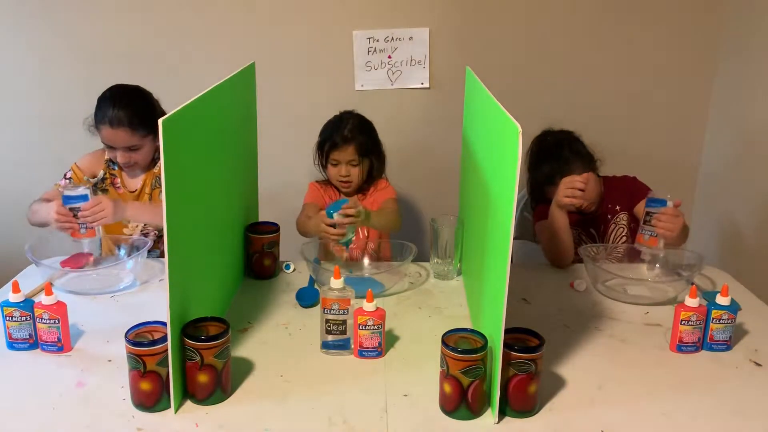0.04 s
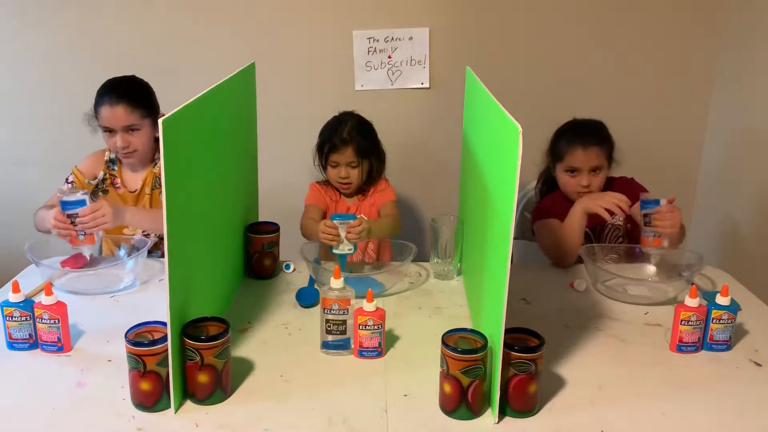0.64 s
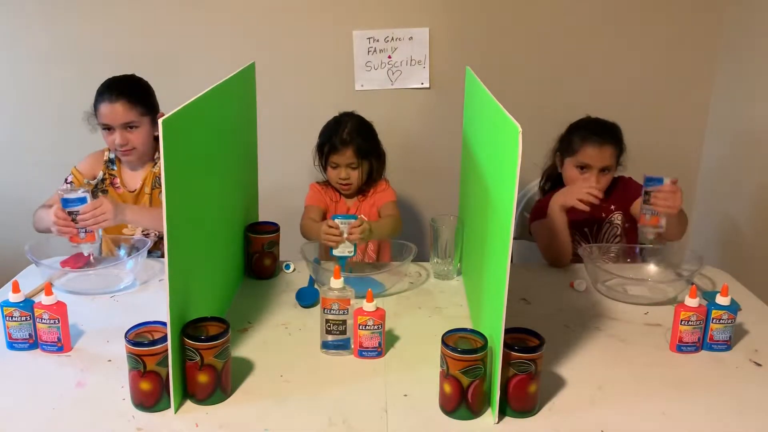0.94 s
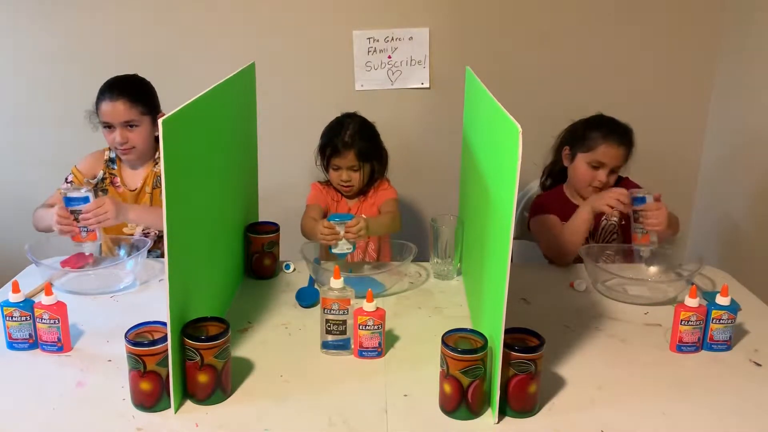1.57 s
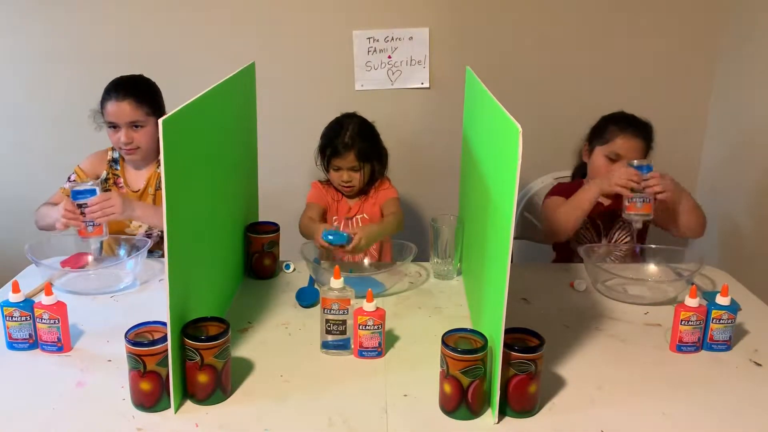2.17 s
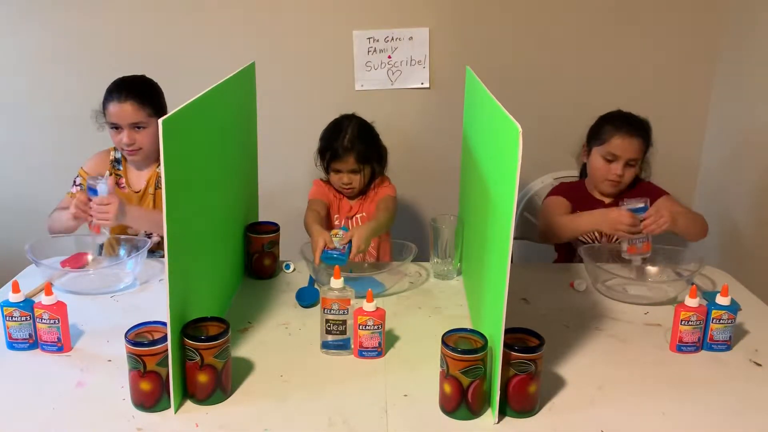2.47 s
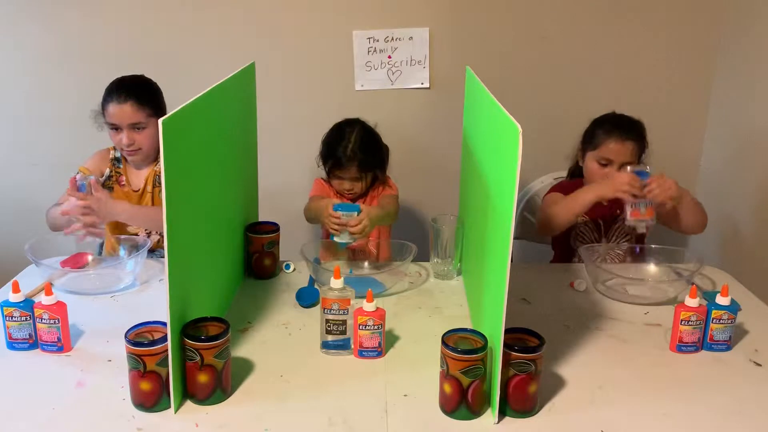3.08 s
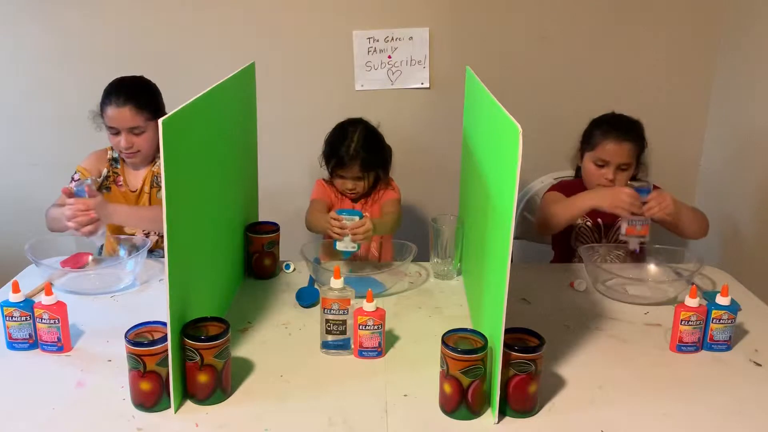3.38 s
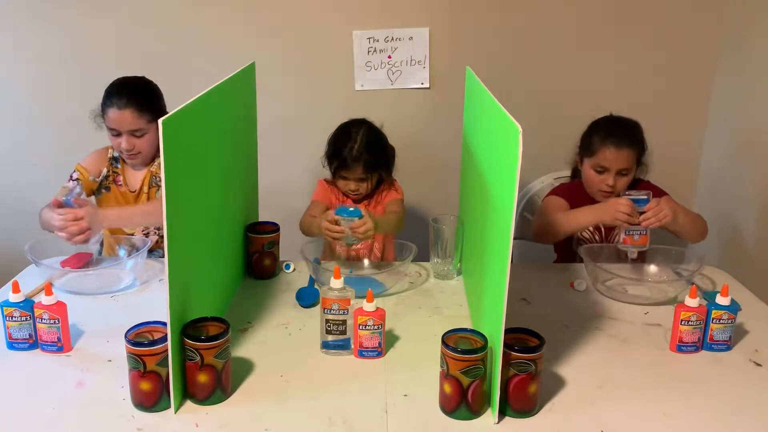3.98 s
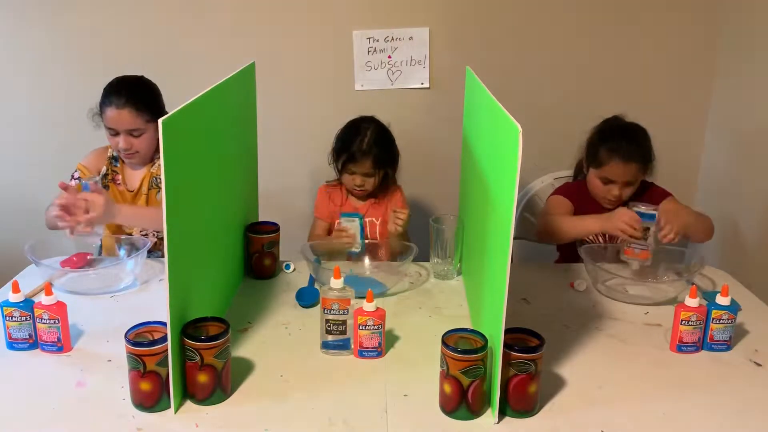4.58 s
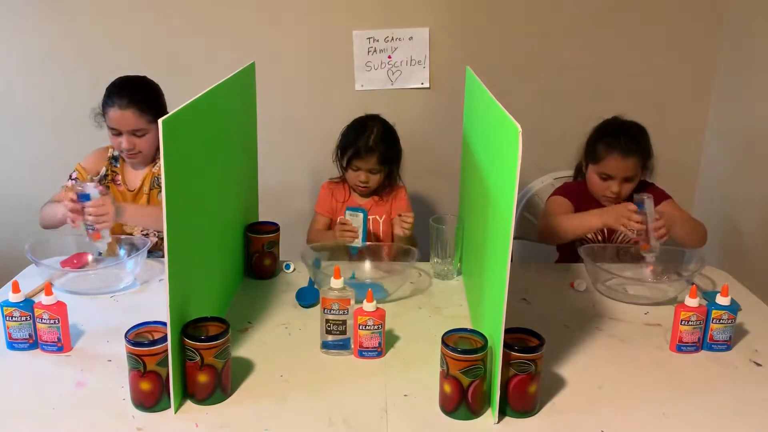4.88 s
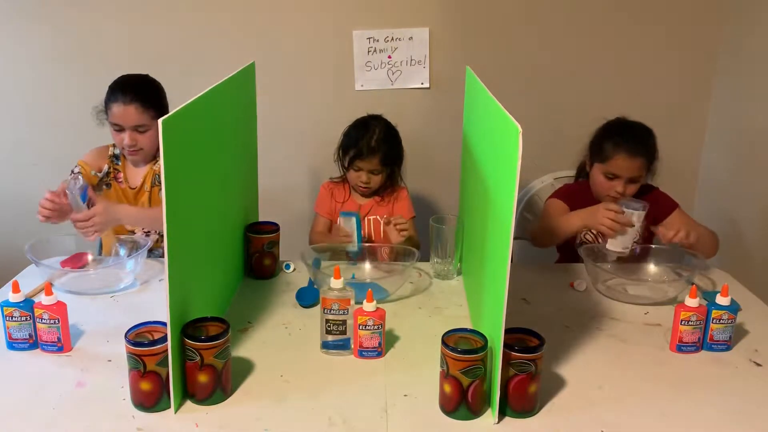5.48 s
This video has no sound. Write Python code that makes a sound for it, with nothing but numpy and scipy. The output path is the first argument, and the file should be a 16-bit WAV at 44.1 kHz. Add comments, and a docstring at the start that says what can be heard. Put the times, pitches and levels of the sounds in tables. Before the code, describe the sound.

Over a faint, low appliance hum, glue sputters from squeezed plastic bottles in many brief, wet, hissy spits, mixed with soft low plops and quiet handling. Near the end the squelching stops, a plastic cap clicks, and a hollow bottle clacks and thuds unevenly against a table. The sounds spread across a stereo microphone, with the short reflections of a small, bare room.

```python
"""Three children squeeze glue from plastic bottles into bowls at a table in a small, bare room.
An appliance hums faintly throughout. For the first 4.5 s air spits through the glue at the nozzles
in short fizzing squelches, a few with a squeak, while bubbles glug inside the bottles and hands rub them.
At 4.6 s a cap snaps. From 4.9 s to the end a hollow bottle knocks about on the table."""
import sys
import numpy as np
from scipy import signal
from scipy.fft import rfft, irfft
from scipy.io import wavfile
from scipy.ndimage import uniform_filter1d

SR = 44100
rng = np.random.default_rng(int(sys.argv[2]) if len(sys.argv) > 2 else 0)


def file_out(sig):
    """Save sig as 16-bit WAV at sys.argv[1]."""
    # one column per channel
    cols = np.atleast_2d(sig).T
    # limit, then scale
    lim = np.clip(cols, -1, 1)
    pcm = np.round(lim * 32767).astype(np.int16)
    wavfile.write(sys.argv[1], SR, pcm)


N = 252693
T = np.arange(18000) / SR  # time axis of one event, seconds

# Room decay. Each row: frequency in Hz, T60 in seconds.
ROOM_T60 = [(150, 0.27), (400, 0.37), (1000, 0.29), (2800, 0.4), (7000, 0.33), (14000, 0.22)]
# Diffuse sound at the two microphones. Each row: frequency in Hz, correlation.
MIC_CORRELATION = [(60, 0.87), (250, 0.94), (500, 0.51), (1000, -0.12), (2000, 0.13), (4000, 0.58),
                   (8000, 0.17), (14000, -0.49)]
# Stereo width. Each row: frequency in Hz, side gain in dB.
STEREO_WIDTH = [(250, 1), (1000, -2.5), (4000, 5), (8500, 0.5), (13000, -1)]
# Still room air. Each row: frequency in Hz, relative density in dB.
AIR_SPECTRUM = [(25, -1), (50, 14), (100, 6), (160, -2.5), (300, -3), (450, -4), (900, -51), (2000, -29),
                (5000, -46.5), (7300, -37), (9000, -27), (13500, -53), (16000, -57)]
# Hands shifting on the bottles. Each row: time in seconds, level in dB.
HANDLING_LEVEL = [(0, -68), (.6, -67.5), (1.2, -60), (1.7, -65), (2.2, -62.5), (2.701, -66.5),
                  (3.35, -61.5), (3.8, -65), (4.4, -65.5), (5.201, -66), (5.73, -58)]
# A bottle or sleeve sliding. Each row: start in seconds, length in seconds, level in dB, centre in Hz.
SLIDES = [(0.25, .12, -59.5, 785), (3.304, 0.081, -63, 1450), (5.37, 0.13, -53, 1760)]
# Cap snapping. Each row: start in seconds, click level in dB, thud level in dB, thud pitch in Hz.
CAP_SNAPS = [(4.591, -53, -44.5, 225), (4.602, -32.5, -35.5, 273), (4.612, -39.5, -33.5, 193)]
# Overall tone of the click as heard, with a dip near 7.3 kHz. Each row: frequency in Hz, gain in dB.
CLICK_TONE = [(300, -9), (1100, -8.5), (1600, -5.5), (1900, 6), (2600, -1.5), (3500, -4.5), (4300, -15),
              (5400, -10.5), (7300, -26), (9000, -15.5), (14000, -35)]
# Bottle on table. Each row: start in seconds, clack level in dB, thud level in dB, thud pitch in Hz.
BOTTLE_KNOCKS = [(4.872, -18, -15.5, 228), (4.883, -28, -16.5, 264), (4.940, -59, -21, 186.4),
                 (4.960, -25, -19.5, 251), (5.036, -35.5, -26, 270), (5.278, -30.5, -16.5, 288),
                 (5.554, -23.5, -15, 247)]
# Ring of bottle and table. Each row: frequency in Hz, relative level in dB, T60 in seconds.
KNOCK_MODES = [(653, 12.5, 0.11), (840, -16, 0.06), (1153, -16, 0.14), (1810, -1, 0.075), (2040, 5, 0.14),
               (2280, -1, 0.08), (3700, 7, 0.073)]
# Overall tone of the clack as heard, with a dip near 7.3 kHz. Each row: frequency in Hz, gain in dB.
CLACK_TONE = [(150, -14), (400, -10.5), (750, -3), (1000, -3), (1250, -5), (1550, -9.5), (2400, -9.5),
              (3500, -15), (5000, -23), (6300, -23), (7300, -34.5), (8500, -20), (10000, -28), (14000, -38)]
# Bubbles in a bottle. Each row: start in seconds, level in dB, pitch in Hz, wall overtone in dB.
BOTTLE_GLUGS = [(0.053, -31, 233, -3.5), (0.061, -31.5, 287, -8.5), (0.372, -28, 273, -9.5),
                (0.382, -28.5, 248, -3.5), (0.525, -26, 293, -4.5), (0.543, -31.5, 232, 1),
                (0.762, -31, 240, 1), (0.853, -31.5, 268, -10), (0.941, -37, 260, -5),
                (1.038, -35, 250, -1), (1.094, -31, 233, -7.5), (1.293, -25.5, 282, -17.5),
                (1.396, -30, 266, -31), (1.53, -36.5, 231, -3.5), (1.711, -35, 220, -22),
                (1.83, -37, 258, -4), (1.857, -36, 290, -9), (2.001, -26.5, 252, -2.5),
                (2.12, -35, 260, -11), (2.286, -31.5, 289, 2.5), (2.582, -40.5, 244, -19),
                (2.827, -33.5, 277, 10.5), (2.848, -29.5, 279, 7.5), (2.99, -38, 349, -1),
                (3.358, -45, 257, -24), (3.485, -25.5, 226, -35), (3.636, -40, 251, -9),
                (3.897, -32.5, 243, -15), (3.97, -40, 279, 9), (4.151, -27.5, 246, -3),
                (4.265, -23.5, 272.6, -7)]
# Pinched nozzle. Each row: start in seconds, level in dB, pitch in Hz, decay in seconds.
NOZZLE_SQUEAKS = [(0.617, -39, 7920, 0.0036), (0.622, -49, 4580, .028), (0.830, -41, 4940, 0.0059)]
# Overall tone of the fizz as heard. Each row: frequency in Hz, gain in dB.
FIZZ_TONE = [(300, 0), (700, 15), (1400, 9.5), (2300, 3.5), (3600, 4), (5000, 2.5), (7500, 3.5),
             (9500, 4.5), (13000, -5.5), (14500, 4), (15500, -29)]
# Air bursting through glue. Each row: time in seconds, level in dB, decay in seconds,
# gain below 3.4 kHz in dB, nozzle resonance in Hz, side from -1 (left) to 1 (right).
NOZZLE_BURSTS = [(0.05, -44.5, .008, -5.5, 5020, 1), (0.374, -49, 0.0024, -2.5, 6670, -1),
                 (0.535, -39.5, 0.014, 1, 10000, 1), (0.749, -42.5, 0.095, -3.5, 8650, 0),
                 (0.803, -30, 0.0048, -13.5, 6240, -1), (0.903, -47.5, 0.012, -15.5, 8260, 1),
                 (1.034, -42, 0.015, -5, 9600, 1), (1.056, -39, .018, -5.5, 8720, 1),
                 (1.094, -39.5, 0.0048, -10.5, 8950, 1), (1.223, -50.5, 0.0081, -1.5, 6800, 0),
                 (1.382, -47.5, 0.023, 1.5, 2740, 0), (1.526, -42, 0.011, 3.5, 4270, 1),
                 (1.712, -41, 0.014, -6.5, 7300, -1), (1.819, -50.5, .007, -3, 8800, -1),
                 (1.835, -41, 0.024, -4.5, 8770, -1), (1.996, -42, .014, -2, 8200, 1),
                 (2.115, -46.5, 0.011, -1, 9000, 1), (2.285, -51, 0.013, 0.5, 7750, -1),
                 (2.598, -51, 0.045, -1.5, 9800, 0), (2.779, -56.5, 0.0033, -9, 9300, 0),
                 (2.83, -37, 0.021, 3, 3900, -1), (2.971, -44, 0.022, -2, 9800, 0),
                 (3.142, -52, .006, -7, 8300, 0), (3.480, -46.5, .011, -6.5, 6650, 1),
                 (3.638, -53, 0.037, 0, 4000, 0), (3.738, -56, .035, -6, 8560, 0),
                 (3.892, -44, 0.049, -1, 6500, -1), (3.967, -46, 0.047, -1, 5570, 0),
                 (4.146, -39, 0.008, -7.5, 7980, 1), (4.26, -46.5, 0.026, 1.5, 9140, 0),
                 (4.425, -59.5, .01, -7, 9200, 0)]


def amp(db):
    """Decibels to gain."""
    return 10 ** (np.asarray(db) / 20)


def unit(x):
    """Scales to rms 1."""
    return x / np.sqrt(np.mean(x ** 2) + 1e-20)


def lookup(table, hz):
    """Interpolates a table over log frequency."""
    f, value = np.transpose(table)
    return np.interp(np.log(hz + 1), np.log(f + 1), value)


def freqs(x):
    """FFT bin frequencies of x in Hz."""
    return np.fft.rfftfreq(x.shape[-1], 1 / SR)


def colour(x, db):
    """Minimum-phase filter with gain db at freqs(x)."""
    log_gain = np.log(amp(np.concatenate([db, db[-2:0:-1]])))
    return irfft(rfft(x) * np.exp(np.conj(signal.hilbert(log_gain)))[:len(db)])


def drift(shape, cutoff_hz):
    """Slow random motion, rms 1."""
    noise = rng.standard_normal(shape)
    return unit(irfft(rfft(noise) / (1 + (freqs(noise) / cutoff_hz) ** 4), N))


def pops(samples, per_s, spread_db):
    """Sparse clicks of random sign and size."""
    size = amp(spread_db * np.minimum(rng.exponential(1, samples), 4))
    return size * rng.choice([-1, 1], samples) * (rng.random(samples) < per_s / SR)


def add(mix, start_s, db, sound):
    """Mixes in a sound with its loudest 8 ms at db."""
    peak_power = uniform_filter1d((sound ** 2).mean(0), size=353).max()
    part = mix[:, max(round(start_s * SR), 0):][:, :sound.shape[1]]
    part += amp(db) / np.sqrt(peak_power) * sound[:, :part.shape[1]]


def diffuse(pair):
    """Correlates two signals like diffuse sound at two close microphones."""
    correlation = np.clip(lookup(MIC_CORRELATION, freqs(pair)), -1, 1)
    a, b = rfft(pair)
    mid, side = a * np.sqrt((1 + correlation) / 2), b * np.sqrt((1 - correlation) / 2)
    return irfft(np.array([mid + side, mid - side]), pair.shape[-1])


def room(x, wet_db, side=0., early_db=-3.0, spacing_s=0.000217):
    """Direct sound, later at the far microphone; then strong early reflections and a wall tail."""
    hz, t, spectra = signal.stft(rng.standard_normal((2, len(T))), SR, nperseg=256)
    decay = amp(-60 * t / lookup(ROOM_T60, hz)[:, None])
    tail = signal.istft(spectra * decay, SR, nperseg=256)[1][:, :len(T)]
    onset = np.clip((T - .001) / .003, 0, 1)
    tail = diffuse(tail) * onset * (1 + amp(early_db) * np.exp(-T / .025))
    wet = unit(signal.fftconvolve(x[None], tail, axes=1)[:, :len(T)]) * np.std(x)
    delay_s = spacing_s * np.clip([[1 + side], [1 - side]], 0, 2) / 2
    direct = irfft(rfft(x) * np.exp(-2j * np.pi * freqs(x) * delay_s))
    return direct + amp(wet_db) * wet


def cavity(hz, decay_s, overtone_db, overtone_ratio=2.143, wall_s=0.0023, sag_ratio=0.756, sag_db=-11):
    """Air in a soft bottle swells and dies; the walls add a damped overtone and a low sag."""
    phase = 2 * np.pi * hz * T
    swell = 1 - np.exp(-(T * hz / 1.49) ** 2)  # about 1.5 cycles
    air = np.sin(phase) * np.exp(-T / decay_s)
    walls = amp(overtone_db) * np.sin(phase * overtone_ratio) + amp(sag_db) * np.sin(phase * sag_ratio)
    return -(air + walls * np.exp(-T / wall_s)) * swell


def rattle(contact_s):
    """A briefly chattering contact, flattened in spectrum."""
    chatter = rng.standard_normal(len(T)) * np.sqrt(T) * np.exp(-T / contact_s)
    flat = irfft(np.exp(1j * np.angle(rfft(chatter))))
    return flat * np.exp(-T / .04)


def room_air(level_db=-51):
    """Steady diffuse noise, mostly bass."""
    noise = diffuse(rng.standard_normal((2, N)))
    return amp(level_db) * unit(irfft(rfft(noise) * amp(lookup(AIR_SPECTRUM, freqs(noise))), N))


def appliance_hum(pitch_hz=70.6, level_db=-51.5, waver=0.33):
    """One low tone, wavering in level and phase."""
    a, b = drift((2, N), cutoff_hz=3)
    tone = np.exp(2j * np.pi * pitch_hz * np.arange(N) / SR)
    return amp(level_db) * unit(((1 + waver * (a + 1j * b)) * tone).real)


def handling(bump_db=8, dull_db_per_octave=5, spell_db=2.0):
    """Fingers rub, crinkle and softly bump the bottles in uneven spells."""
    hz = freqs(T)
    level_db = np.interp(np.arange(N) / SR, *np.transpose(HANDLING_LEVEL))
    level_db += spell_db * drift(N, cutoff_hz=6)
    creases, taps = pops(N, per_s=300, spread_db=3.5), pops(N, per_s=50, spread_db=3.5)
    crinkle_db = lookup(FIZZ_TONE, hz) - dull_db_per_octave * np.log2(1 + hz / 1500)
    crinkle = room(colour(signal.unit_impulse(len(T)), crinkle_db), wet_db=12)
    bump = room(cavity(hz=230, decay_s=0.001, overtone_db=-12.5), wet_db=9.5)
    rub = .1 * rng.standard_normal(N)
    rustle = unit(signal.fftconvolve((creases + rub)[None], crinkle, axes=1)[:, :N])
    bumps = unit(signal.fftconvolve(taps[None], bump, axes=1)[:, :N])
    return amp(level_db) * (rustle + amp(bump_db) * bumps)


def slides(width_octaves=0.47, catch_db=-4):
    """Friction with fine catches swells and fades in one broad band."""
    out, hz = np.zeros((2, N)), freqs(T)
    for start_s, length_s, db, centre_hz in SLIDES:
        stroke = np.sin(np.pi * np.minimum(T / length_s, 1))
        friction = rng.standard_normal(len(T))
        friction += amp(catch_db) * unit(pops(len(T), per_s=450, spread_db=4))
        band_db = -20 * np.log10(1 + (np.log2((hz + 20) / centre_hz) / width_octaves) ** 2)
        add(out, start_s, db, room(colour(stroke * friction, band_db), wet_db=0))
    return out


def cap_snap():
    """Stiff plastic snaps, bright and thin, and nudges the bottle."""
    out = np.zeros((2, N))
    for start_s, click_db, thud_db, thud_hz in CAP_SNAPS:
        click = colour(rattle(contact_s=0.0049), lookup(CLICK_TONE, freqs(T)))
        add(out, start_s, click_db, room(click, wet_db=4, side=-0.13) * amp([[.8], [-.8]]))
        thud = cavity(thud_hz, decay_s=0.0072, overtone_db=4, overtone_ratio=1.8)
        add(out, start_s, thud_db, room(thud, wet_db=5.5))
    return out


def knocks(firm_db=-22.5, ring_db=-37, crackle_db=-6, crackle_s=0.0085, thud_lag_s=0.00238):
    """A rattling contact rings the plastic and leaves it crackling; the hollow body thuds after."""
    out, hz = np.zeros((2, N)), freqs(T)
    modes = [amp(db - 60 * T / t60_s) * np.sin(2 * np.pi * f * T) for f, db, t60_s in KNOCK_MODES]
    ring = amp(ring_db) * np.mean(modes, axis=0)
    for start_s, clack_db, thud_db, thud_hz in BOTTLE_KNOCKS:
        force_db = clack_db - firm_db  # harder: brighter clack, shorter thud
        tilt_db = 0.33 * force_db * np.log2(1 + hz / 1000)
        decay_s = 0.0023 * 2 ** (-force_db / 18)
        contact = rattle(contact_s=0.0018)
        crackle = pops(len(T), per_s=760, spread_db=0.5) * np.exp(-T / crackle_s)
        strike = (unit(contact) + amp(crackle_db) * unit(crackle)) / np.sqrt(len(T))
        clack = colour(strike + ring, lookup(CLACK_TONE, hz) + tilt_db)
        add(out, start_s, clack_db, room(clack, wet_db=5.5, side=-0.33) * amp([[1.1], [-1.1]]))
        thud = cavity(thud_hz, decay_s, overtone_db=-8.5, overtone_ratio=1.877)
        add(out, start_s + thud_lag_s, thud_db, room(thud, wet_db=0.5, early_db=-6.0))
    return out


def glugs():
    """Each bubble rings the air in a bottle: one soft, low plop."""
    out = np.zeros((2, N))
    for start_s, db, pitch_hz, overtone_db in BOTTLE_GLUGS:
        decay_s = 0.003 + 0.0006 * amp(overtone_db) ** 2  # longer the more the walls shake
        add(out, start_s, db, room(cavity(pitch_hz, decay_s, overtone_db), wet_db=-1.0, early_db=0.5))
    return out


def fizz_db(shelf_db):
    """Fizz spectrum with a shelf below 3.4 kHz; more shelf sounds wetter."""
    hz = freqs(T)
    return lookup(FIZZ_TONE, hz) + shelf_db / (1 + (hz / 3400) ** 4)


def squeaks(drop=.07, settle_s=0.0022, roughness=0.045, hiss_db=-4):
    """Air whistles through a pinched nozzle: a rough, hissy tone drops onto its pitch."""
    out = np.zeros((2, N))
    for start_s, db, pitch_hz, decay_s in NOZZLE_SQUEAKS:
        flutter = unit(uniform_filter1d(rng.standard_normal(len(T)), size=16))
        tone_hz = pitch_hz * (1 + drop * np.exp(-T / settle_s) + roughness * flutter)
        tone = np.sin(2 * np.pi * np.cumsum(tone_hz) / SR)
        hiss = amp(hiss_db) * unit(colour(rng.standard_normal(len(T)), fizz_db(shelf_db=-4)))
        envelope = (1 - np.exp(-T / settle_s)) * np.exp(-T / decay_s)
        add(out, start_s, db, room(envelope * (tone + hiss), wet_db=0.5, side=-1.2))
    return out


def small_bubbles(t, swell_s, decay_s, count=8, ring_s=0.0038, glide=0.018):
    """Tiny bubbles ring at random high pitches around a burst at t = 0."""
    out = np.zeros(len(t))
    for when, pitch, size in rng.random((count, 3)):
        age_s = np.maximum(t - (when * (swell_s + decay_s) - swell_s), 0)
        hz = 5000 * 2.9 ** pitch * (1 + glide * np.exp(-age_s / ring_s))
        out += size * np.sin(2 * np.pi * hz * age_s) * np.exp(-age_s / ring_s)
    return out


def squelches(leak_s=0.0091, leak_db=-16, typical_db=-42, bubble_db=-4, nozzle_db=9.5, nozzle_q=8.5):
    """A glue film leaks, then snaps and tears in clumps of tiny pops, coloured by the nozzle."""
    out, hz = np.zeros((2, N)), freqs(T)
    lead_s = 2 * leak_s
    t = T - lead_s
    leak = amp(leak_db) * np.exp(-abs(t) / leak_s)
    for burst_s, db, decay_s, shelf_db, nozzle_hz, side in NOZZLE_BURSTS:
        swell_s = 0.0052 * 2 ** ((typical_db - db) / 4.5)  # harder bursts swell faster
        burst = np.exp(np.minimum(t / swell_s, -t / decay_s))
        envelope = (burst + leak) * np.minimum(T / lead_s, 1)
        clumps = amp(4 * unit(uniform_filter1d(rng.standard_normal(len(T)), size=150)))
        fizz = pops(len(T), per_s=1100, spread_db=3) + 0.076 * rng.standard_normal(len(T))
        tear = envelope * clumps * fizz
        snap = rng.standard_normal(len(T)) * (t > 0) * np.exp(-abs(t) / 0.0026)
        snap_db = -1.5 - 10 * np.log10(decay_s / 0.012)  # a long sputter is mostly fizz
        bubbles = small_bubbles(t, swell_s, decay_s)
        spit = unit(tear) + amp(snap_db) * unit(snap) + amp(bubble_db) * unit(bubbles)
        resonance_db = nozzle_db / (1 + (2 * nozzle_q * (hz / nozzle_hz - 1)) ** 2)
        squelch = colour(spit, fizz_db(shelf_db) + resonance_db)
        add(out, burst_s - lead_s, db, room(squelch, wet_db=3.0, side=side))
    return out * amp([[-.7], [.7]])


def scene():
    """Sounds at the table over the room background."""
    table = squelches() + squeaks() + glugs() + knocks() + cap_snap() + slides() + handling()
    background = (room_air() + appliance_hum()) * amp([[-.9], [.9]])
    return table + background


def record(dry, notch_hz=11700, notch_width_hz=480, notch_db=-20, cutoff_hz=15700):
    """Stereo image widest near 4 kHz and narrower in the treble, with a treble notch and a band limit."""
    hz, (left, right) = freqs(dry), rfft(dry)
    mid, side = (left + right) / 2, (left - right) / 2 * amp(lookup(STEREO_WIDTH, hz))
    notch = amp(notch_db * np.exp(-((hz - notch_hz) / notch_width_hz) ** 2))
    heard = irfft(np.array([mid + side, mid - side]) * notch, N)
    lowpass = signal.firwin(255, cutoff_hz, window=("kaiser", 9), fs=SR)
    return signal.oaconvolve(heard, lowpass[None], "same")


dry = scene()
out = record(dry)
file_out(out)
```